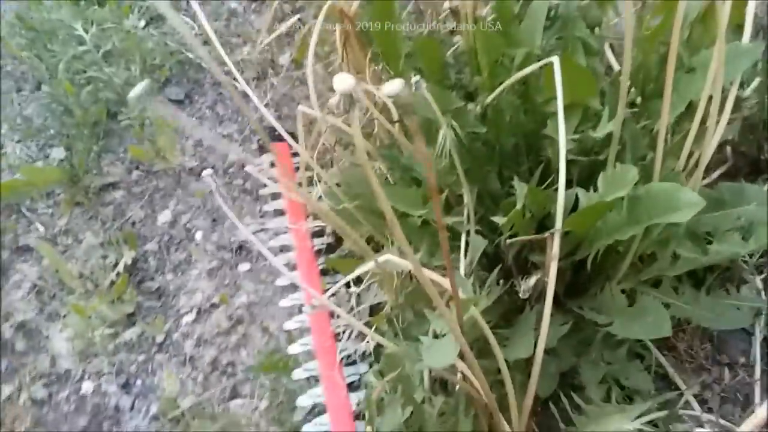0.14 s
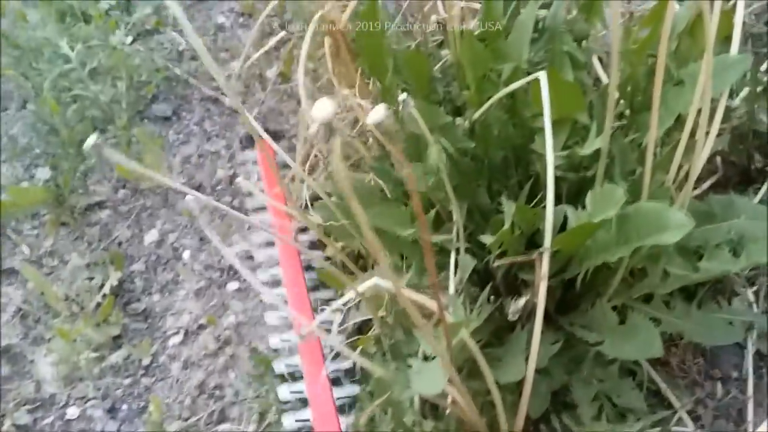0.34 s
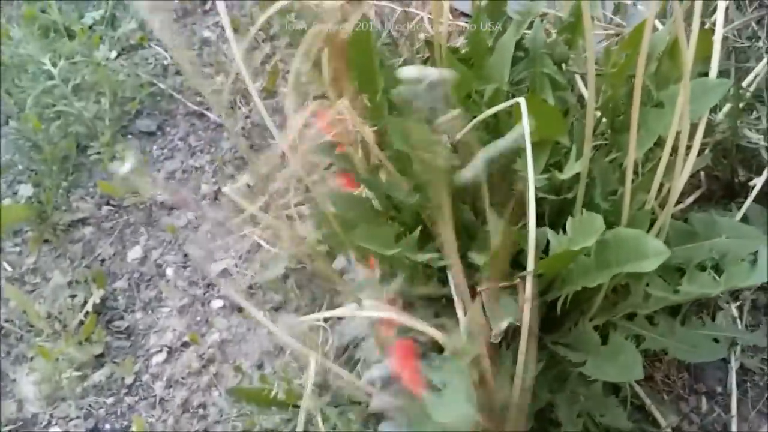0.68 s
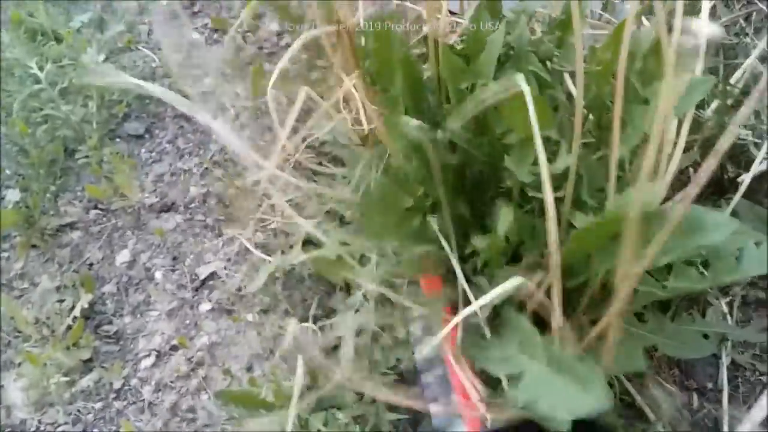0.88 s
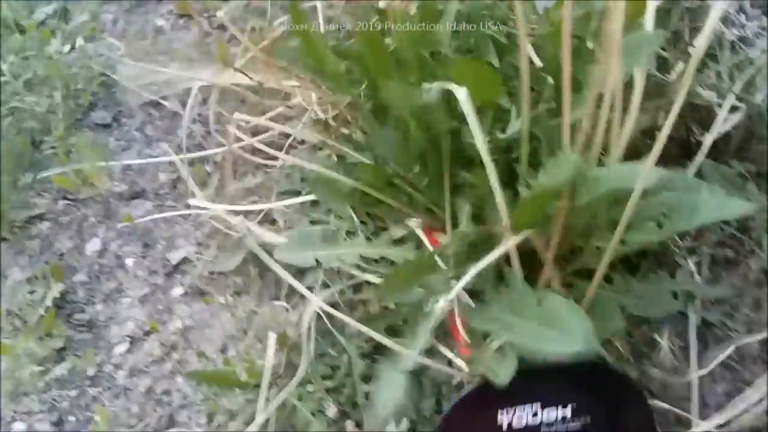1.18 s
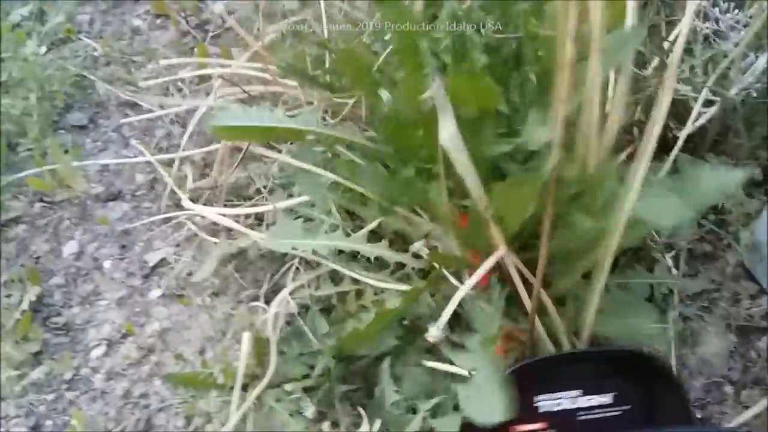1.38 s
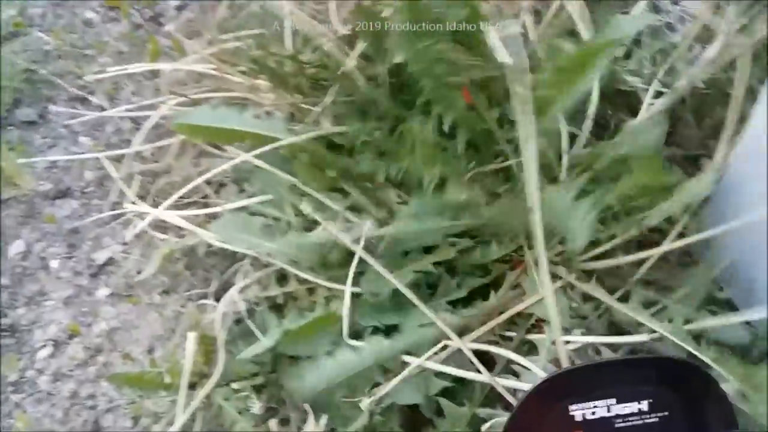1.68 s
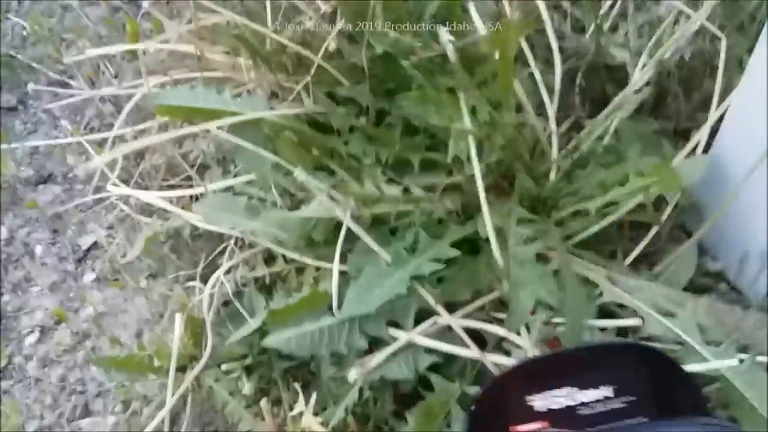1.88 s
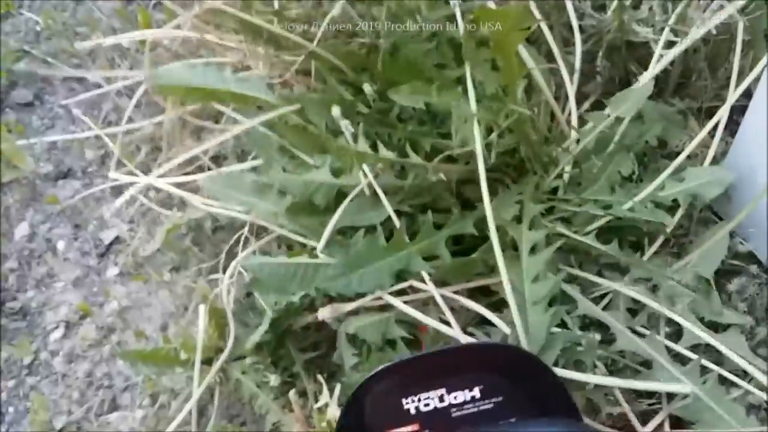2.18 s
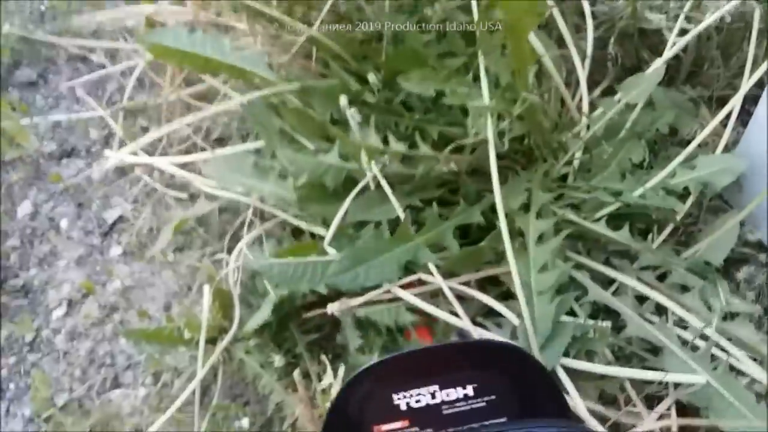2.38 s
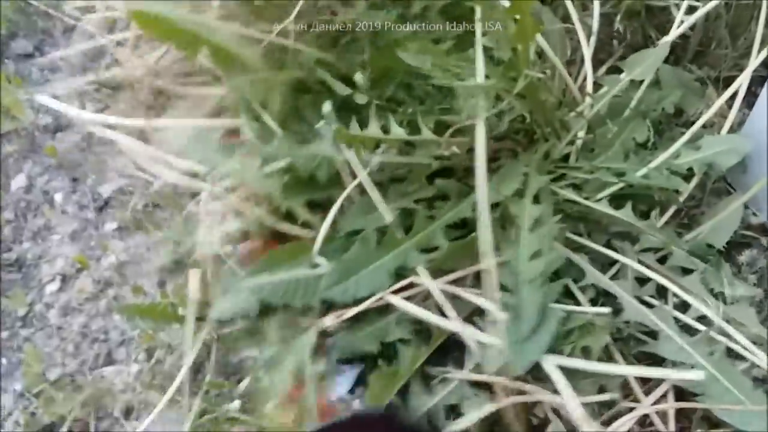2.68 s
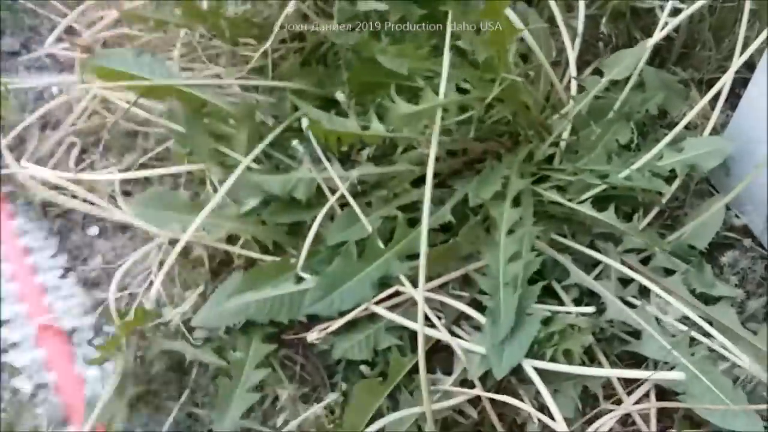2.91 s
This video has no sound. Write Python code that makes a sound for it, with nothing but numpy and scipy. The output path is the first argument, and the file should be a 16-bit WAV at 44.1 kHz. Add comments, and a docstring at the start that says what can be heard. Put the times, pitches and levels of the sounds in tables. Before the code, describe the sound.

Hedge trimmer starts after a few hard trigger clicks over a faint low engine hum; its fast rattling, scraping blades then run to the end, close and dry in open air, louder on the left.

```python
"""First, trigger clicks close by over a far engine's hum, low air noise and the rustle of hand and stems.
Then a small cordless hedge trimmer runs, held close and to the left of a two-port microphone, outdoors.
A crank drives the blades: gear knocks rattle the plastic housing, the steel blades scrape and snap at each
stroke end, a gear whines. Knocks are random impacts, filtered, with bands that drift; snaps are decaying
noise bursts; clicks are decaying sines with a noise crack; whine, crank tones and hum are wavering sines."""
import sys
import numpy as np
from scipy import signal
from scipy.fft import rfft, irfft, next_fast_len
from scipy.io import wavfile
from scipy.ndimage import uniform_filter1d, map_coordinates

SR = 44100
rng = np.random.default_rng(int(sys.argv[2]) if len(sys.argv) > 2 else 0)


def to_linear_factor(level_db):
    """Convert decibel levels (scalar or array-like) to linear amplitude factors."""
    exponent = np.asarray(level_db, float) / 20
    return 10 ** exponent


def inscribe(sig):
    """Save sig as 16-bit PCM at rate SR to the path in sys.argv[1].

    A 1-D sig is mono; a 2-D sig holds one channel per row.
    Samples are clipped to [-1, 1] before scaling.
    """
    pcm = np.round(np.clip(np.atleast_2d(sig).T, -1, 1) * 32767)
    wavfile.write(sys.argv[1], SR, pcm.astype(np.int16))


N = 134505
T = np.arange(N) / SR
START_S = .3955  # the motor starts


def unit(x):
    """Scaled to rms 1."""
    return x / np.sqrt(np.mean(x ** 2) + 1e-20)


def along(points, hz):
    """Reads (f/Hz, value) points on a log frequency axis."""
    f, v = np.transpose(points)
    return np.interp(np.log(hz + 1), np.log(f + 1), v)


def curves(rows):
    """One value per sample for each column after the time."""
    s, *cols = np.transpose(rows)
    return [np.interp(T, s, c) for c in cols]


def wobble(rate):
    """A smooth random curve, rate knots a second."""
    return map_coordinates(rng.standard_normal(int(N * rate / SR) + 4), [T * rate])


def filtered(x, response):
    """x times a response of frequency."""
    m = next_fast_len(N + 8192)
    return irfft(rfft(x, m) * response(np.fft.rfftfreq(m, 1 / SR)), m)[..., :N]


def causal(gain_db):
    """The minimum-phase response with this gain, from its folded cepstrum."""
    c = irfft(np.log(to_linear_factor(gain_db) + 1e-6))
    c[1:len(c) // 2] *= 2
    c[len(c) // 2 + 1:] = 0
    return np.exp(rfft(c))


def knocks(rate, spread_db, noise_share):
    """Two streams of tiny impacts at shared random moments, over some noise."""
    size = (rng.random(N) < rate / SR) * to_linear_factor(spread_db * rng.standard_normal(N))
    return rng.standard_normal((2, N)) * (unit(size) + noise_share)


def gritty(exciter, spectrum, peaks, patchy_db):
    """An exciting pair given time-frequency patches, colour and resonances; rms 1."""
    z = signal.stft(exciter, nperseg=512)[2]
    field = rng.standard_normal(z.shape[1:])
    field = uniform_filter1d(uniform_filter1d(field, size=4, axis=0), size=10, axis=1)
    pair = signal.istft(z * to_linear_factor(patchy_db * unit(field)), nperseg=512)[1][:, :N]

    def lift(hz):
        return sum(db / (1 + ((hz - c) / w * 2) ** 2) for c, w, db in peaks)
    return unit(filtered(pair, lambda hz: causal(along(spectrum, hz) + lift(hz))))


def bursts(rows, t60, spectrum):
    """Coloured noise bursts that decay from rows of (t/s, level/dB)."""
    hits = np.zeros(N)
    s, db = np.transpose(rows)
    hits[np.round(s * SR).astype(int)] = to_linear_factor(db)
    t = T[:SR // 10]
    shape = signal.fftconvolve(hits, to_linear_factor(-60 * t / t60))[:N]
    noise = rng.standard_normal((2, N))
    colour = lambda hz: causal(along(spectrum, hz))
    return filtered(noise * shape, colour) / np.std(filtered(noise, colour))


# colour of the air noise: f/Hz, relative level/dB
AIR_COLOUR = [(12, -91), (20, -62), (60, -11), (80, -15), (97, -15), (146, -11.5), (445, -18),
              (1780, -17.5), (2000, -42), (2600, -66), (4400, -120)]


def air():
    """Low, patchy air noise around the microphone."""
    return to_linear_factor(-58) * gritty(rng.standard_normal((2, N)), AIR_COLOUR, [], patchy_db=3.8)


def microphone_hiss():
    """The microphone's own white noise."""
    return to_linear_factor(-72) * rng.standard_normal((2, N))


# far engine: t/s, level/dB before a 1 dB lift
HUM = [(0, -48), (.06, -46), (.1, -61), (.19, -66), (.35, -58), (.44, -56), (.55, -60.5), (.94, -49.5),
       (1.3, -48), (1.78, -41), (2.05, -41), (2.33, -43.5), (2.68, -49), (3.05, -51)]


def far_engine():
    """One low sine from far off, its level and phase wavering."""
    level = to_linear_factor(curves(HUM)[0] + 1 + 0.89 * wobble(10.23))
    hum = level * np.sin(2 * np.pi * 68.7 * T + 0.36 * wobble(6.0))
    return hum * [[1], [.7]]  # shared part, unshared part


# hand and stems moving: t/s, level/dB
RUSTLE = [(0, -62.5), (.05, -54.5), (.08, -57.5), (.11, -39), (.15, -56.5), (.19, -62), (.2, -62.5),
          (.3, -70), (.308, -56.5), (.34, -62), (.39, -64.5)]
# colour of the rustle: f/Hz, relative level/dB
LEAVES = [(500, -19), (1200, 1), (2200, 2), (3500, 1), (7000, -11), (15900, -23)]


def rustle():
    """Hand and stems move: sparse tiny impacts over noise."""
    brushing = knocks(690, spread_db=0.0, noise_share=1.2)
    return to_linear_factor(curves(RUSTLE)[0]) * gritty(brushing, LEAVES, [], patchy_db=1.4)


# trigger clicks: t/s, level/dB, crack level over it/dB,
# softness/dB (ring loss per octave above SOFT_HZ; also taken whole off the jab)
CLICKS = [(0.0474, -20.5, -19.5, 17), (0.0874, -11.5, -7.5, 8), (0.1, -8, -10, 4.5),
          (0.1753, -35.5, -8.5, -2), (0.185, -45, -3, 5), (0.306, -41.5, -19, 10), (.364, -51, -6, 4),
          (0.3955, -23.5, -1.5, 6)]
# modes of the plastic trigger: f/Hz, relative level/dB, t60/s
TRIGGER = [(953, -14.5, 0.066), (1630, -8, 0.033), (2185, 1, 0.028), (2600, 3, 0.012), (3110, 1.5, 0.018),
           (3380, -8, 0.018), (4500, 0, 0.012), (7100, -12, 0.015), (10000, -15, 0.01)]
# the housing jolts: f/Hz, relative level/dB, t60/s
THUMP = (74, -19, 0.15)
# colour of the crack: f/Hz, relative level/dB
CRACK = [(60, -19), (150, -4), (330, -16), (700, -5), (1000, 1), (2200, -8), (3400, 2), (5100, -3.5),
         (7050, -4), (9000, -14.5), (15900, -14)]
SOFT_HZ = 3180
RING_OFFSET_DB, RING_RISE_S = -11, 0.00035
JAB_DB, JAB_S = -2.5, .00006  # the blow itself is one short push


def click_ring(t, soft_db):
    """Trigger modes and housing jolt as decaying sines, duller for a softer click."""
    ring = 0
    for hz, level, t60 in [*TRIGGER, THUMP]:
        loss_db = soft_db * max(np.log2(hz / SOFT_HZ), 0)
        db = level - loss_db + rng.normal(0, 1.3, (2, 1)) - 60 * t / t60
        ring = ring + to_linear_factor(db) * np.sin(2 * np.pi * (hz * t + rng.random((2, 1))))
    return ring * (1 - np.exp(-t / RING_RISE_S))


def trigger():
    """Each click pushes once, rings the plastic trigger and housing, and cracks."""
    out, t = np.zeros((2, N + SR)), T[:SR // 5]
    for s, db, _, soft_db in CLICKS:
        span = slice(round(s * SR), round(s * SR) + len(t))
        out[:, span] += to_linear_factor(db + RING_OFFSET_DB) * click_ring(t, soft_db)
        push = np.e * t / JAB_S * np.exp(-t / JAB_S)  # peak 1
        out[0, span] -= to_linear_factor(db + JAB_DB - soft_db) * push
    cracks = [(s, db + crack_db) for s, db, crack_db, _ in CLICKS]
    return out[:, :N] + bursts(cracks, 0.021, CRACK)


# crank speed: t/s, rate/turns per s
CRANK = [(.4, 38.86), (1, 38.92), (1.4, 38.32), (1.8, 39.19), (2.1, 38.32), (2.4, 37.63), (2.7, 38.35),
         (3.05, 38.93)]
START_TURN = .89  # crank angle at START_S, in turns


def turns():
    """Crank angle in turns, the running sum of its speed."""
    return START_TURN + np.cumsum(curves(CRANK)[0]) / SR - START_S * CRANK[0][1]


def load_db(shape):
    """Level swing round the crank, once and twice a turn."""
    once_db, at, twice_db, at2 = shape
    return once_db * np.cos(2 * np.pi * (turns() - at)) + twice_db * np.cos(4 * np.pi * (turns() - at2))


# gear whine: t/s, f/Hz, level/dB
WHINE = [(.9, 2425, -64), (1.15, 2425, -42), (1.32, 2412, -39), (1.55, 2405, -35), (1.65, 2420, -46),
         (2.0, 2380, -39.5), (2.13, 2350, -35.5), (2.25, 2365, -30), (2.5, 2372, -27.5),
         (2.62, 2365, -27.5), (2.7, 2380, -33), (2.78, 2395, -50), (3.05, 2440, -45)]
# whine load: once-a-turn depth/dB, its peak/turns, twice-a-turn depth/dB, its peak/turns
WHINE_LOAD = (3.4, .95, 1.8, .14)
WHINE_LEFT_DB, WHINE_LEAD = 6, 0.12  # left over right; mean lead of the left in radians


def whine():
    """The gear's single line swells unevenly with the crank and reaches both ports almost in step."""
    hz, db = curves(WHINE)
    side = np.array([[.5], [-.5]])  # left, right
    angle = 2 * np.pi * np.cumsum(hz) / SR + 1.4 * wobble(30) + 0.58 * wobble(160)
    angle = angle + side * (WHINE_LEAD + 0.34 * wobble(51))
    swing_db = load_db(WHINE_LOAD) * (1 + .4 * wobble(25.06)) + 1.9 * wobble(50)
    return to_linear_factor(db + side * WHINE_LEFT_DB + swing_db) * np.sin(angle)


# low tones of the crank: multiple of its rate, offset/dB
ORDERS = [(6, -8.5), (7, -0.5)]
# their common level: t/s, level/dB
ORDERS_LEVEL = [(.45, -62), (.6, -50.5), (.9, -51), (1.1, -66), (1.45, -56), (1.6, -51), (2.0, -65),
                (2.3, -52), (2.5, -51.5), (3.05, -61.5)]


def crank_tones():
    """Two sines at whole multiples of the crank rate, each wavering in level."""
    out = 0
    for multiple, db in ORDERS:
        level = to_linear_factor(db + curves(ORDERS_LEVEL)[0] + 1.8 * wobble(6.9))
        out = out + level * np.sin(2 * np.pi * multiple * turns())
    return out


# individual blade snaps: t/s, level/dB before a 1.5 dB cut
SNAPS = [(0.785, -26), (0.9375, -40), (1.249, -30), (1.301, -34), (1.3248, -36), (1.353, -32), (1.403, -26),
         (1.431, -22), (1.508, -31), (1.613, -22), (1.8694, -28), (2.0222, -33), (2.0727, -23.5),
         (2.1, -21), (2.1524, -30.5), (2.206, -28), (2.26, -20.5), (2.3909, -29), (2.4687, -48),
         (2.497, -27), (2.603, -22.5), (2.578, -24), (2.629, -18), (2.6824, -19.5), (2.7076, -29),
         (2.733, -31), (2.758, -17.5), (2.835, -27), (2.8877, -28), (2.9516, -28)]
# colour of a snap: f/Hz, relative level/dB
SNAP_COLOUR = [(1500, -120), (2500, 10.5), (5000, 1), (7100, 9), (9000, 0.5), (13000, 4), (16000, -3.5)]
SNAP_TURN = 0.0082  # crank angle of a stroke end, in turns
SNAP_DB, BACK_DB, SNAP_SPREAD_DB = -35, -4, 3  # usual level; return stroke weaker; random spread


def snaps():
    """The blades snap at each stroke end, unevenly, louder as the hiss grows; some strokes catch a stem."""
    half_turns = np.floor(2 * (turns() - SNAP_TURN))
    ends = np.flatnonzero((np.diff(half_turns) > 0) & (T[1:] > START_S))
    chance = rng.standard_normal((len(ends), 2))
    rattle_db, _, hiss_db = curves(DRIVE)
    hiss_level_db = rattle_db + hiss_db
    strength_db = (hiss_level_db - np.mean(hiss_level_db))[ends]
    back = half_turns[ends + 1] % 2
    db = SNAP_DB + strength_db + BACK_DB * back + SNAP_SPREAD_DB * chance[:, 0]
    times = np.clip(T[ends] + .0007 * chance[:, 1], 0, T[-1])
    return bursts(np.r_[np.c_[times, db], np.array(SNAPS) + [0, -1.5]], 0.017, SNAP_COLOUR)


KNOCK_SPREAD_DB = 3.5
REPEAT_SHARE, SLOTS = .6, 1100  # gain of the chatter that returns every turn; slots round the crank
SLACK_DB, SLACK_TURN, SLACK_UNTIL_S = 1.5, 0.6, 0.82  # swing depth, its peak in turns, its end


def chatter(rate, noise_share, load, lumps_db):
    """Knocks, some the same at every turn, swinging with the crank and bunching.
    The free-running drive clatters once a turn until the blades enter the stems."""
    slot = (turns() % 1 * SLOTS).astype(int)
    same = knocks(rate, KNOCK_SPREAD_DB, noise_share)[:, slot]
    fresh = knocks(rate, KNOCK_SPREAD_DB, noise_share)
    slack_db = SLACK_DB * np.cos(2 * np.pi * (turns() - SLACK_TURN)) * np.clip((SLACK_UNTIL_S - T) * 10, 0, 1)
    return (fresh + REPEAT_SHARE * same) * to_linear_factor(load_db(load) + slack_db + lumps_db)


def drifting(exciter, rows, width_hz):
    """One band of the tool's noise, picked out by a double-pole filter, drifts in pitch and level."""
    hz, db = curves(rows)
    spin = np.exp(2j * np.pi * np.cumsum(hz) / SR)
    pole = np.exp(-np.pi * width_hz / SR)
    # shift the band to 0 Hz, filter it there, shift back
    band = signal.lfilter([1], [1, -2 * pole, pole ** 2], exciter / spin) * spin
    return to_linear_factor(db - 7) * unit(band.real)


# running drive: t/s, housing rattle level/dB, blade scrape over it/dB, treble hiss over it/dB (before trims)
DRIVE = [(.4, -38.5, 4, -4), (.58, -35, 3, -6.5), (.81, -33.5, 2, -5), (1.09, -34, 3, -7),
         (1.37, -33.5, 7.5, -3), (1.53, -31.5, 3.5, -5), (1.75, -32, 3, -5), (1.95, -31, 2, -7),
         (2.1, -30, 2, -4.5), (2.35, -31, 2, -4.5), (2.55, -31, 2, -5.5), (2.71, -31, 1.5, -3),
         (2.85, -34, 5, -2), (3.05, -31.5, 0.5, -6)]
# colours of housing rattle, blade scrape and treble hiss: f/Hz, relative level/dB
RATTLE = [(53, -50), (90, -14), (97, -26), (129, -21), (259, -12), (310, -11.5), (480, -5), (728, -1.5),
          (919, -1), (1150, -3.5), (1700, -16), (2210, -25.5), (3740, -120)]
SCRAPE = [(820, -44), (1400, -5), (1730, -9.5), (2470, 0.5), (2720, -1.5), (3100, -5.5), (3390, 0.5),
          (3640, -3), (3970, -3), (4940, -5), (6000, -12.5), (7800, -37), (13200, -120)]
HISS = [(3000, -36), (5200, -5), (6390, -4), (7280, 2.5), (9030, -8.5), (9730, -7), (11200, -6),
        (15800, -6)]
# resonances of housing and blades: f/Hz, width/Hz, lift/dB
HOUSING = [(687, 45, 4), (812, 35, 3), (1345, 110, 4), (1690, 30, 2)]
BLADES = [(4835, 83, 3.8), (7070, 170, 4), (8800, 46, 1.8), (9500, 110, 7.5)]
# load round the crank: once-a-turn depth/dB, its peak/turns, twice-a-turn depth/dB, its peak/turns
RATTLE_LOAD = (0.85, 0.43, 0.2, 0.073)
SCRAPE_LOAD = (0.66, 0.33, 0.75, 0.038)
HISS_LOAD = (0.52, .03, 0.51, 0.04)
# drifting bands of the tool's noise, as its ground reflection shifts while it moves:
# t/s, f/Hz, level/dB before a 7 dB cut; named for their pitch, lowest first
BAND_900 = [(.41, 860, -31), (.52, 1066, -36), (.7, 920, -39.5), (1.0, 925, -33.5), (1.35, 960, -29.5),
            (1.62, 940, -29), (1.8, 960, -24), (1.95, 960, -37), (2.05, 856, -33), (2.25, 880, -24),
            (2.4, 914, -29), (2.65, 892, -25.5), (3.05, 946, -35)]
BAND_1300 = [(.44, 1315, -37), (.9, 1330, -41.5), (1.5, 1340, -41), (2.2, 1310, -44), (2.65, 1320, -30),
             (2.85, 1310, -39), (3.05, 1210, -32)]
BAND_1800 = [(.44, 1830, -37.5), (.7, 1850, -37), (1.3, 1890, -40.5), (1.9, 1920, -43), (2.26, 1750, -29),
             (2.6, 1680, -27.5), (2.75, 1840, -37), (3.05, 1950, -36)]
BAND_2700 = [(.44, 2650, -40.5), (.7, 2600, -36), (.9, 2660, -41), (1.05, 2720, -32), (1.2, 2660, -28.5),
             (1.4, 2760, -33), (1.7, 2680, -29.5), (2.1, 2810, -43), (2.6, 2730, -51), (2.8, 2730, -31.5),
             (3.05, 2640, -37)]
BAND_3400 = [(.44, 3450, -47), (.7, 3275, -35), (1.1, 3330, -36.5), (1.35, 3440, -37), (1.55, 3300, -37),
             (1.7, 3414, -27.5), (1.95, 3450, -32), (2.3, 3520, -31), (2.7, 3340, -47), (3.05, 3390, -31)]
BAND_4100 = [(.44, 4050, -38), (.8, 4070, -44), (1.05, 3920, -38), (1.38, 4060, -42), (1.55, 4110, -37),
             (1.75, 4100, -29.5), (1.95, 4090, -39), (2.5, 3990, -50), (3.05, 4180, -35)]
# width/Hz of each filter pole, in the order of the list in drive()
BAND_WIDTHS_HZ = (150, 170, 85, 600, 170, 170)


def drive():
    """Gear knocks rattle the housing and the blades; all swings with the crank."""
    level_db, scrape_db, hiss_db = curves(DRIVE)
    level_db = level_db + .5 * wobble(12)
    lumps = wobble(110)  # bunching common to gears and blades

    def gears():
        return chatter(3500, 0.36, RATTLE_LOAD, 1.3 * lumps + 1.04 * wobble(80))

    def teeth():
        return chatter(5600, 0.71, SCRAPE_LOAD, 0.68 * lumps + 0.47 * wobble(90))

    slide = knocks(10500, KNOCK_SPREAD_DB, noise_share=0.85) * to_linear_factor(load_db(HISS_LOAD) + 0.84 * wobble(90))
    rattle = to_linear_factor(-1.82) * gritty(gears(), RATTLE, HOUSING, patchy_db=0.83)
    scrape = to_linear_factor(scrape_db - 1.0) * gritty(teeth(), SCRAPE, BLADES, patchy_db=1.37)
    hiss = to_linear_factor(hiss_db - 0.5) * gritty(slide, HISS, BLADES, patchy_db=1.2)
    exciters = (gears, teeth, teeth, gears, teeth, gears)
    paths = (BAND_900, BAND_2700, BAND_3400, BAND_1800, BAND_4100, BAND_1300)
    bands = sum(drifting(exciter(), rows, width)
                for exciter, rows, width in zip(exciters, paths, BAND_WIDTHS_HZ))
    return to_linear_factor(level_db) * (rattle + scrape + hiss) + bands


# left port over right: f/Hz, level/dB
LEFT_DB = [(60, -0.5), (130, 2.5), (290, 1), (640, 3), (1410, 5.5), (3100, 7.0), (6820, 6), (15000, -3)]
# phase by which the left port leads in the shared part: f/Hz, lead/radians
LEAD = [(0, 0), (2410, 1.25), (3360, -2.5), (5000, 3.5), (10500, 4), (12000, 7.5), (15500, 9), (16500, 19)]
# likeness of the two ports, setting the split into shared and unshared: f/Hz, share (0 to 1)
ALIKE = [(60, .93), (150, .7), (300, .85), (700, .9), (1400, .6), (2800, .42), (5500, .2), (11000, .05)]


def microphone_port(shared, own, side):
    """One port (side 1 left, -1 right) hears the shared part and, with opposite sign, the unshared."""
    def port(hz):
        lead = np.interp(hz, *np.transpose(LEAD))
        return to_linear_factor(side * along(LEFT_DB, hz) / 2) * np.exp(.5j * side * lead)

    def split(hz):
        return np.arccos(np.clip(along(ALIKE, hz), 0, 1)) / 2
    common = filtered(shared, lambda hz: port(hz) * np.cos(split(hz)))
    return common + side * filtered(own, lambda hz: port(hz) * np.sin(split(hz)))


def scene():
    """All sources at two ports, mostly louder on the left and out of step; the whine has its own placing."""
    run_up_s = 0.017  # time constant of the level rise
    running = (T > START_S) * (1 - np.exp(-np.abs(T - START_S) / run_up_s))
    background = air() + rustle() + far_engine() + microphone_hiss()
    shared, own = running * (drive() + crank_tones() + snaps()) + trigger() + background
    ports = np.array([microphone_port(shared, own, side) for side in (1, -1)])
    return to_linear_factor(1.0) * ports + running * whine()  # 1 dB lift on all but the whine


def top_cut(x):
    """Nothing passes above the cut-off."""
    return signal.sosfilt(signal.butter(12, 16950, fs=SR, output="sos"), x)


def record(dry):
    """The recorder's band limit: a 150 Hz wide slope ending at 15.9 kHz."""
    mix = filtered(dry, lambda hz: np.clip((15900 - hz) / 150, .003, 1))
    return top_cut(mix)


dry = scene()
out = record(dry)
inscribe(out)
```